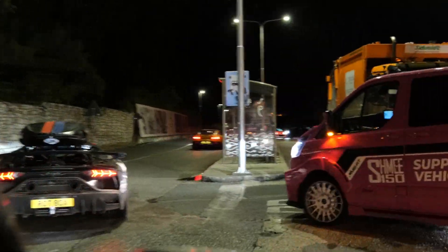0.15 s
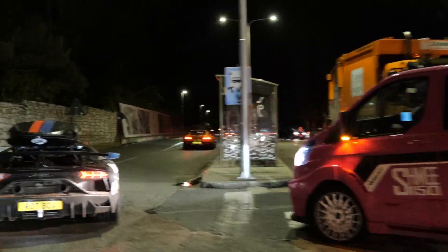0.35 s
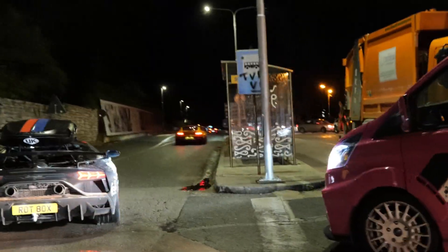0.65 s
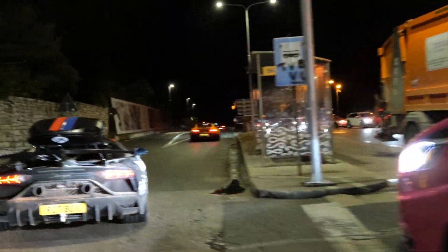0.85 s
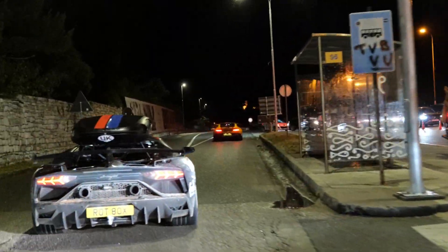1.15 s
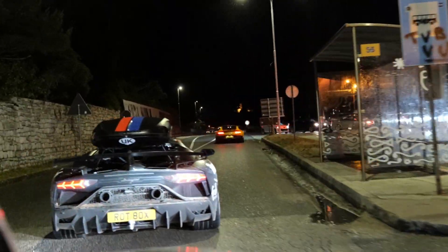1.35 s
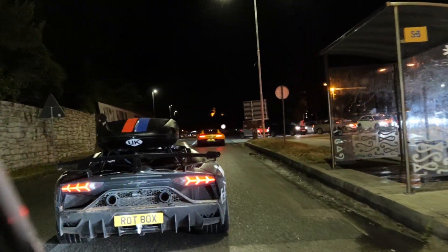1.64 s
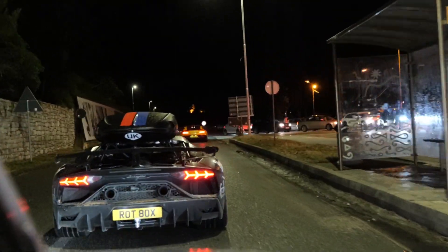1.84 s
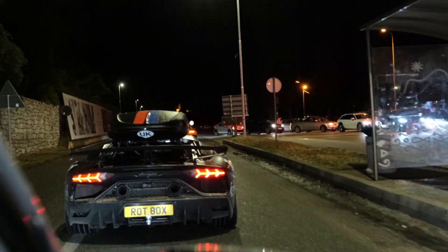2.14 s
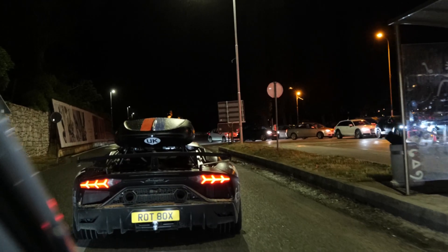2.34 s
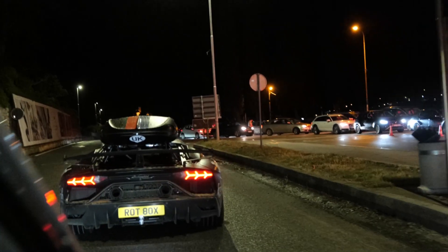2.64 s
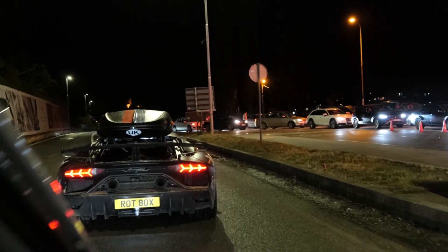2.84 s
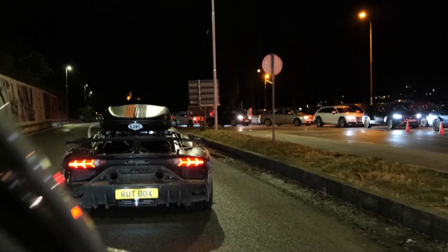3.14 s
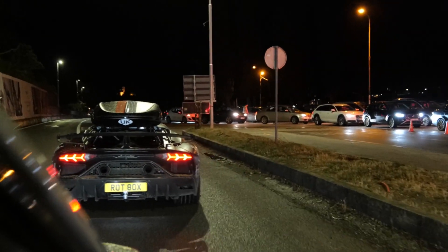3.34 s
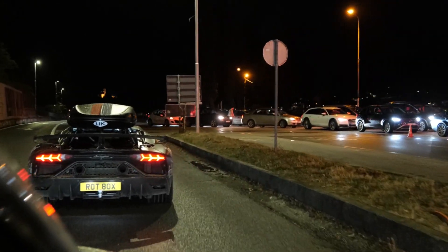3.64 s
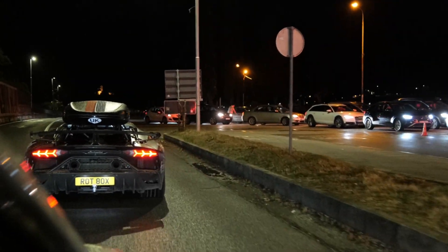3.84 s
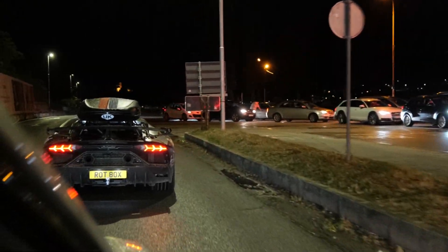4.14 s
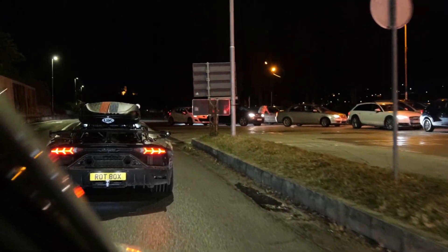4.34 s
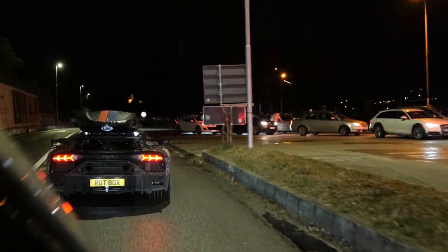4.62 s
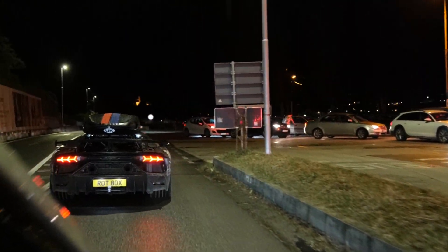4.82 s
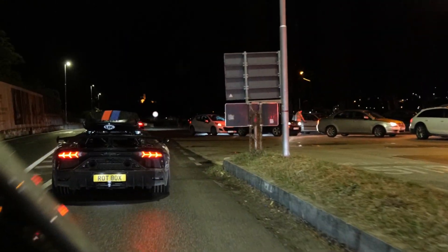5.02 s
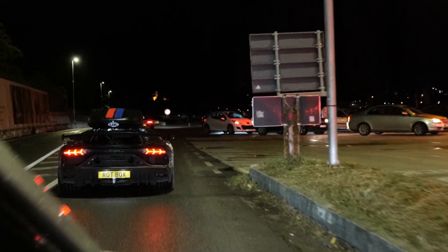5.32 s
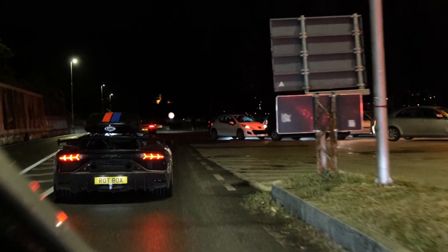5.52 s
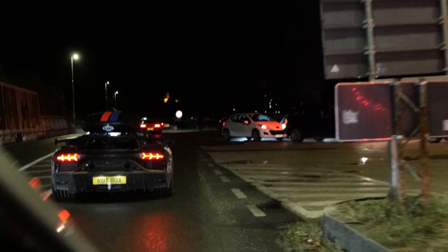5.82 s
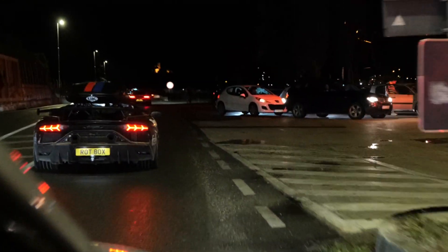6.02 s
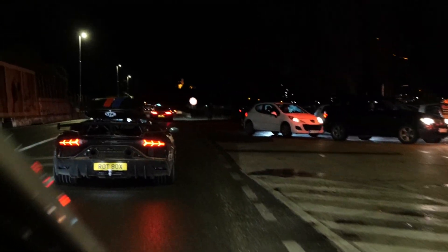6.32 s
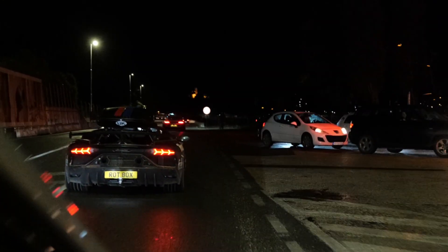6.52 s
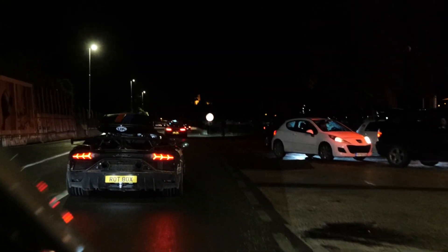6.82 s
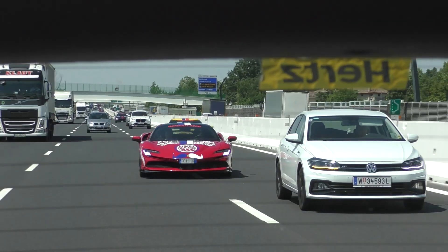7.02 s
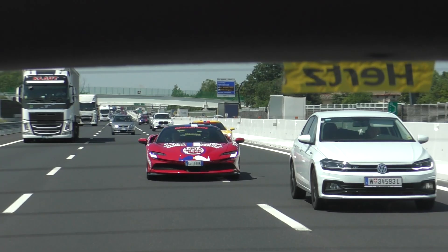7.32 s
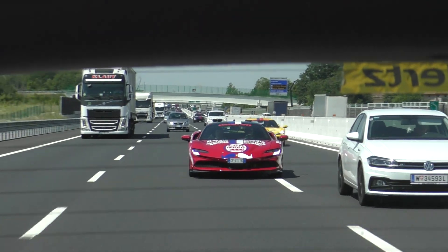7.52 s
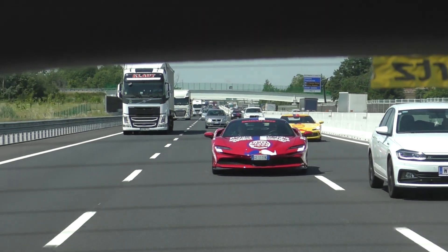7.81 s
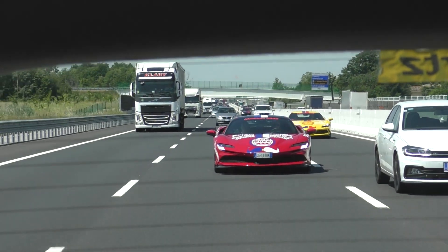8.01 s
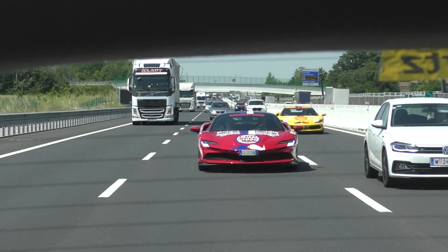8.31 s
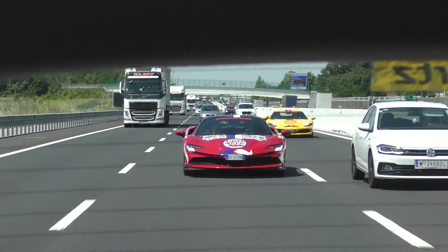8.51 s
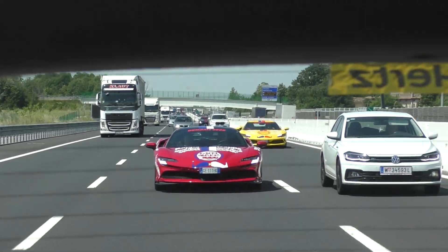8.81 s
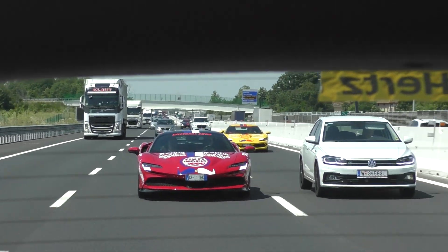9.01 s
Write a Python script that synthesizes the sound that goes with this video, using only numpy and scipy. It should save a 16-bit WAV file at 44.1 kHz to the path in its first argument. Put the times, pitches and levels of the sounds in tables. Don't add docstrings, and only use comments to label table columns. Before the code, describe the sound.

From 0 s a powerful sports-car engine roars just ahead of a following car, a thick, nearly steady low-mid note with gritty exhaust gas. Around 0.7-0.9 s it shifts up: the tone sags and breaks, a clutch squeak stutters briefly, a deep clunk lands with a puff of air. From about 1 s the lower, lumpy note climbs smoothly until nearly 5 s, wavering and raspy, with hollow pipe rings, small bright ticks and short rips near 3.6 and 4 s. Pops begin at 4.6 s; by 5.1-5.4 s the engine tone falls away, leaving dense burbles, thumps, sharp crackles and spits, with a faint coasting tone after 6.25 s and bright backfires near 6.7 s. At 6.9 s it cuts abruptly to a motorway cabin: much quieter, dull tyre rumble, faint wind hiss, and a soft fluctuating mid-low drone that fades, the hiss lifting slightly until about 9.1 s.

```python
import sys
import numpy as np
from scipy import signal
from scipy.fft import rfft, irfft, next_fast_len
from scipy.io import wavfile
from scipy.ndimage import uniform_filter1d

SR = 44100
rng = np.random.default_rng(int(sys.argv[2]) if len(sys.argv) > 2 else 0)


def attenuation_scalar(level_db):
    decades = np.asarray(level_db, float) / 20
    return 10 ** decades


def to_wav(sig):
    pcm = np.clip(np.atleast_2d(sig), -1, 1) * 32767
    pcm = np.round(pcm).astype(np.int16)
    wavfile.write(sys.argv[1], SR, pcm.T)


N = 403956
CUT_S = 6.895

# time_s, level_db
BURBLE = [(4.6, -37), (4.9, -34), (5.0, -30.5), (5.15, -24.5), (5.55, -24), (5.88, -20.5), (6.05, -23.5),
          (6.6, -27), (6.65, -26), (6.72, -27.5), (6.86, -22)]


def evened(x):
    return x / np.sqrt(np.mean(abs(x) ** 2) + 1e-20)


def read(points, hz):
    f, value = np.transpose(points)
    return np.interp(np.log(hz + 1), np.log(f + 1), value)


def played(rows):
    s, *columns = np.transpose(rows)
    return [np.interp(np.arange(N) / SR, s, c) for c in columns]


def between(start_s, end_s, fade_s):
    t = np.arange(N) / SR
    return np.clip(np.minimum(t - start_s, end_s - t) / fade_s + .5, 0, 1)


def bump(centre_s, length_s):
    t = np.arange(N) / SR
    return np.exp(-np.minimum(((t - centre_s) / length_s) ** 2, 50))


def bumps(events):
    return sum(db * bump(s, length) for s, db, length in events)


def flutter(hz, size=N):
    coarse = rng.standard_normal((size // 32 + 2, 2)) @ [1, 1j]
    r = np.exp(-2 * np.pi * hz * 32 / SR)
    once = signal.lfilter([1], [1, -r], coarse)
    slow = evened(signal.lfilter([1], [1, -r], once))
    return np.interp(np.arange(size) / 32, np.arange(len(slow)), slow)


def ring(hz, width_hz):
    carrier = np.exp(2j * np.pi * np.cumsum(hz * np.ones(N)) / SR)
    return np.sqrt(2) * (flutter(width_hz) * carrier).real


def noise(colour, same, lean, patchy_db, flicker_db):
    frames, hz = N // 256 + 16, np.fft.rfftfreq(1024, 1 / SR)
    a, b, c, d, patches = rng.standard_normal((frames, 513, 5)).T
    patches = uniform_filter1d(uniform_filter1d(patches, size=10, axis=0), size=12, axis=1)
    flicker = evened(uniform_filter1d(rng.standard_normal(frames), size=3))
    field = patchy_db * np.clip(evened(patches), -2, 2) + flicker_db * flicker
    same = np.clip(read(same, hz), -1, 1)[:, None]
    left = a + 1j * b
    right = same * left + np.sqrt(1 - same ** 2) * (c + 1j * d)
    z = np.array([left, right]) * attenuation_scalar(read(colour, hz)[:, None] + field)
    z = z * attenuation_scalar(np.outer([.5, -.5], read(lean, hz)))[:, :, None]
    return signal.istft(z, nperseg=1024, noverlap=768)[1][:, 512:N + 2560]


def layers(x, edges):
    size = next_fast_len(x.shape[1])
    z, hz = rfft(x, size), np.fft.rfftfreq(size, 1 / SR)
    above = [1] + [np.clip(.5 + 2 * np.log2((hz + 1) / e), 0, 1) for e in edges] + [0]
    return [evened(irfft(z * (lo - hi), size)[:, 1024:N + 1024]) for lo, hi in zip(above, above[1:])]


def add(mix, start_s, sound):
    part = mix[:, round(start_s * SR):][:, :sound.shape[-1]]
    part += sound[..., :part.shape[1]]


def cabin():
    # pitch_hz, density_db_per_hz
    cabin_colour = [(20, -43.5), (60, -6.5), (100, -9), (190, -10.5), (300, -13.5), (420, -19), (750, -29),
                    (1000, -33.5), (1400, -38), (2000, -45), (3000, -53.5), (5000, -59), (9000, -71.5),
                    (15000, -81.5)]
    # pitch_hz, likeness (0 to 1)
    cabin_same = [(60, 0.97), (130, 0.94), (270, 0.61), (580, 0.65), (1220, 0.33), (2600, 0.15)]
    # pitch_hz, left_right_db
    cabin_lean = [(60, 1), (130, 1.5), (270, -0.5), (580, -5.5), (1220, -2), (2600, 1)]
    # time_s, pitch_hz, level_db
    drone_curve = [(6.9, 234.5, -23), (7.15, 234.5, -28), (7.4, 234.5, -22), (7.7, 235, -27.5),
                   (8.1, 235.5, -25), (8.3, 235, -30.5), (9.16, 234.5, -30.5)]
    # pitch_hz, width_hz, level_db
    booms = [(305, 14, -35), (112, 10, -34.5), (185, 10, -35), (740, 16, -50), (985, 25, -52)]
    t = np.arange(N) / SR
    rumble, hiss = layers(noise(cabin_colour, cabin_same, cabin_lean, 0.81, 0.55), [1300])
    rumble = rumble * attenuation_scalar(-24.5 + 0.86 * (t - CUT_S))
    hiss = hiss * attenuation_scalar(-52.5 + 4 * np.maximum(t - 8.3, 0))
    hz, drone_db = played(drone_curve)
    tone = (1 + 0.13 * flutter(3.1)) * np.exp(2j * np.pi * np.cumsum(hz) / SR)
    drone = attenuation_scalar(drone_db) * np.sqrt(2) * tone.real
    return rumble + hiss + drone + sum(attenuation_scalar(db) * ring(f, w) for f, w, db in booms)


def ticks():
    # start_s, level_db, pitch_hz, left_right_db
    metal_ticks = [(0.7442, -21, 11500, 6.5), (0.8041, -35, 8560, 2.5), (0.8804, -32, 6120, 1.0),
                   (1.0395, -38, 9660, 3.0), (1.2785, -35, 7000, 1.5), (1.4594, -38, 6040, 2.5),
                   (1.5299, -37, 6060, 1.5), (1.8362, -37, 9860, 2), (1.8931, -36, 8270, 1),
                   (2.0981, -30, 8660, 1), (2.5216, -32, 7500, .5), (4.0756, -29, 6280, 1.0),
                   (4.9387, -42, 8430, -2.0)]
    # start_s, level_db, pitch_hz, left_right_db
    spits = [(5.018, -30, 3100, 4), (5.4237, -36, 3100, 0.5), (5.4794, -39.5, 3100, 0.0),
             (5.4932, -36, 3100, 2), (5.5685, -35.5, 3100, 3), (5.615, -35.5, 3100, 0.5),
             (5.6622, -38, 3100, 3), (5.7098, -30.5, 3100, -1.0), (5.75, -34, 3100, 3),
             (5.7726, -37.5, 3100, -0.5), (5.8045, -32, 3100, 3.5), (5.8267, -33, 3100, -2),
             (5.8594, -39, 3100, 1.5), (5.878, -40.5, 3080, 0), (5.899, -32.5, 3100, 1),
             (5.935, -28.5, 3040, 0.5), (5.9646, -34.5, 3100, 3), (6.016, -27.5, 3080, -0.5),
             (6.0598, -41, 3100, 0.5), (6.0993, -42.5, 3100, 1), (6.1658, -35, 3100, 3.5),
             (6.1815, -28.5, 3100, 3), (6.2455, -31, 3080, 0), (6.3109, -41, 3100, 2.5),
             (6.3482, -41, 3100, 1), (6.4477, -39, 3100, 0.5), (6.5722, -32.5, 3120, 5.5),
             (6.618, -30.5, 3100, 4.5), (6.6663, -30, 3120, 2.5), (6.6836, -31, 3080, -1.5),
             (6.726, -40, 3100, 0.0), (6.7966, -41.5, 3100, -2), (6.8262, -39, 3100, 2),
             (6.8355, -36, 3100, 3.5)]
    out, t = np.zeros((2, N)), np.arange(500) / SR
    for s, db, hz, pan_db in [*metal_ticks, *spits]:
        edges = np.clip([0.45 * hz, 1.3 * hz], 100, SR / 2.2)
        band = signal.butter(2, edges, "band", fs=SR, output="sos")
        strike = (rng.standard_normal(500) + 4.0 * (t == 0)) * np.exp(-t / 0.001)
        tick = signal.sosfilt(band, strike)
        add(out, s, attenuation_scalar(db) * tick / abs(tick).max() * attenuation_scalar([[pan_db / 2], [-pan_db / 2]]))
    return out


def squeak():
    # time_s, pitch_hz, level_db
    song = [(0.69, 1420, -29), (.71, 1470, -36), (0.727, 1510, -47), (0.745, 1560, -29.5),
            (0.78, 1590, -37), (0.805, 1605, -28.5), (0.858, 1600, -31), (.868, 1560, -38),
            (0.885, 1470, -35)]
    hz, db = played(song)
    tone = (1 + .3 * flutter(60)) * np.exp(2j * np.pi * np.cumsum(hz) / SR)
    tone = np.sqrt(2) * tone.real * between(song[0][0], song[-1][0], 0.017)
    return attenuation_scalar(db) * tone * attenuation_scalar([[1.5], [-1.5]])


def tears():
    # centre_s, level_db, length_s
    rips = [(6.661, -27, .002), (6.2, -29.5, .002), (6.679, -30, .003), (6.686, -24.5, 0.0034),
            (6.798, -27, 0.0016), (5.3, -32, .002), (4.05, -27, .012), (3.6, -31, .006)]
    out, t = np.zeros((2, N)), np.arange(-600, 600) / SR
    band = signal.butter(4, [800, 3300], "band", fs=SR, output="sos")
    colour = np.vstack([band, signal.butter(1, 1500, fs=SR, output="sos")])
    for s, db, length in rips:
        grit = rng.standard_normal((3, len(t)))
        rip = evened(signal.sosfilt(colour, grit[0] + .35 * grit[1:]))
        add(out, s + t[0], attenuation_scalar(db) * rip * np.exp(-(t / length) ** 2))
    return out


def flares():
    # centre_s, level_db, length_s, pitch_hz
    wavering_tones = [(1.2, -24, 0.14, 240), (1.6, -22, .1, 200), (4.015, -24, 0.038, 1200),
                      (3.7, -28, 0.037, 1030), (4.245, -28, 0.038, 1010), (4.4, -34, 0.17, 860),
                      (2.2, -33, .05, 1400), (3.05, -31, 0.11, 1100), (2.4, -37, 0.063, 440),
                      (2.6, -24.5, 0.32, 270), (0.85, -15, 0.042, 230), (1.3, -22, 0.09, 190)]
    out, t = np.zeros((1, N)), np.arange(-12000, 12000) / SR
    for s, db, length, hz in wavering_tones:
        tone = ((1 + .7 * flutter(60, len(t))) * np.exp(2j * np.pi * hz * t)).real
        add(out, s + t[0], attenuation_scalar(db) * np.exp(-(t / length) ** 2) * tone)
    return out


def gas():
    # time_s, flow_db
    flow_curve = [(0, -40.5), (.29, -42.5), (.67, -46.5), (.8, -42.5), (1.0, -40), (1.44, -38.5),
                  (1.7, -38), (2.1, -34), (2.6, -32.5), (3.1, -33), (3.5, -37), (3.95, -35.5), (4.25, -36),
                  (4.5, -47.5), (5.38, -45.5), (5.5, -54), (6.9, -50)]
    # centre_s, change_db, length_s
    surges = [(0, 11.5, 0.0073), (0.1, 2.5, 0.055), (0.2, -4.5, 0.057), (0.887, 6.5, 0.028),
              (1.628, 4, 0.086), (1.98, 3, 0.11), (3.19, 0.5, 0.073), (3.301, -3.5, 0.067),
              (3.38, 4, 0.037), (4.076, 4.5, .06), (4.137, -4, 0.027)]
    layer_db = [-26.5, -26, -40.5, -51.5]
    layer_share = [.2, .6, 1.009, 1.1]
    # centre_s, change_db, length_s
    gulp = (5.38, 3.7, 0.09)
    # centre_s, change_db, length_s
    vent = (0.89, 3.8, .05)
    # centre_s, change_db, length_s
    bangs = [
        (6.451, 9, 0.007),
        (6.735, 7.5, 0.014),
    ]
    t = np.arange(N) / SR
    change = played(flow_curve)[0] + 40 + bumps(surges)
    low, middle, rasp, hiss = (attenuation_scalar(db + share * change) for db, share in zip(layer_db, layer_share))
    burble = attenuation_scalar(played(BURBLE)[0]) * (t > BURBLE[0][0])
    deep = burble * attenuation_scalar(7.5 + 1.5 * np.maximum(t - 5.6, 0) + bumps([gulp]))
    bang_db = bumps(bangs)
    hiss = hiss * attenuation_scalar(-1.5 * np.maximum(t - 2.6, 0) + bumps([vent]))
    return np.hypot(low, deep), np.hypot(middle, burble) * attenuation_scalar(0.82 * bang_db), rasp * attenuation_scalar(bang_db), hiss


def roar(turn, levels, puff=0.11):
    # pitch_hz, density_db_per_hz
    roar_colour = [(40, -53.5), (80, -31.5), (130, -7), (220, 0), (330, -7), (550, -9), (850, -16),
                   (1300, -14), (2000, -18.5), (3200, -33), (4200, -35), (6300, -45.5), (10000, -50.5),
                   (15500, -68)]
    # pitch_hz, likeness (0 to 1)
    street_same = [(100, 1), (400, 0.97), (1000, 0.92), (4000, 0.87), (8000, 1), (12000, 0.83)]
    # pitch_hz, left_right_db
    street_lean = [(200, 1), (700, 0.5), (2600, 4), (8000, 2.5), (12000, 1.5)]
    roar_edges = [500, 2500, 6000]
    # pitch_hz, width_hz, level_db
    shell_modes = [(214.6, 9.8, -27), (289.4, 3, -45.5), (554.5, 9, -36), (1250, 37, -46), (1000, 76, -53)]
    # centre_s, level_db, length_s, pitch_hz, width_hz
    pipe_rings = [(2.5, -13.5, .7, 2270, 45), (.3, -8.5, 0.56, 1800, 40), (4.8, -11.5, 0.49, 1840, 25),
                  (2.58, -8, 1, 1245, 40), (3.45, -8, .15, 1450, 80)]
    # centre_s, level_db, length_s, pitch_hz, width_hz
    tip_rings = [(1.6, -1.5, .08, 4150, 320), (2.045, -6, 0.12, 4150, 200), (2.4, -5, 0.064, 4250, 300),
                 (1.44, -6.5, 0.074, 5600, 300), (1.63, 0, 0.15, 2950, 300), (1.7, -0.5, .08, 2850, 300),
                 (.6, -0.5, 0.46, 2950, 230)]
    low_gain, middle_gain, rasp_gain, hiss_gain = levels
    gas_noise = noise(roar_colour, street_same, street_lean, 1.15, 0.98)
    low, middle, rasp, hiss = layers(gas_noise, roar_edges)
    gate = evened(1 + puff * np.cos(turn) + 0.099 * flutter(90).real)
    flow = attenuation_scalar(-11.5 * between(5.1, 99, .5))
    shell = sum(attenuation_scalar(db) * ring(hz, w) for hz, w, db in shell_modes) * middle_gain * attenuation_scalar(23.5)
    middle = middle + sum(attenuation_scalar(db) * bump(s, length) * ring(hz, w) for s, db, length, hz, w in pipe_rings)
    rasp = rasp + sum(attenuation_scalar(db) * bump(s, length) * ring(hz, w) for s, db, length, hz, w in tip_rings)
    body = low_gain * low + gate * middle_gain * attenuation_scalar(-2.5) * middle + shell + flares()
    return flow * body + gate * (np.sqrt(flow) * rasp_gain * rasp + hiss_gain * hiss)


def pop(low_db, high_db):
    # pitch_hz, level_db
    pop_colour = [(70, -20.5), (110, -1.5), (170, 0.5), (260, -10), (400, -3), (600, -5.5), (900, -10),
                  (1400, -17), (2200, -29), (3300, -39.5), (5000, -58.5), (8000, -71), (12000, -60)]
    hz, t = np.fft.rfftfreq(2048, 1 / SR), np.arange(1500) / SR
    ripple = read(np.c_[np.geomspace(100, 9000, num=12), 3.5 * rng.standard_normal(12)], hz)
    tilt = [(300, low_db), (550, 0.0018), (1500, 0.0078), (3000, 0.36 * high_db + 0.5),
            (5000, high_db), (9000, high_db), (15000, high_db - 14.5)]
    db = read(pop_colour, hz) + read(tilt, hz) + ripple
    fold = irfft(db * np.log(10) / 20) * np.r_[1, 2 * np.ones(1023), 1, np.zeros(1023)]
    z = np.exp(rfft(fold))
    burst = rng.standard_normal((3, len(t)))
    blow = (0.75 * burst[0] + 0.69 * burst[1:]) * 0.12 * np.exp(-t / .0045)
    blow[:, 0] = rng.choice([-1, 1])
    crack = irfft(z * (hz > 500) * (hz < 4000))[:1200]
    peak = abs(signal.fftconvolve(blow[0], crack)).max()
    return signal.fftconvolve(blow, irfft(z)[None, :1200], axes=1) / peak


def crackle(middle_gain, per_s=300):
    # start_s, crack_db, thud_db relative to the crack
    pops = [(4.608, -16, -5.5), (4.654, -17.5, -1), (4.713, -18.5, -1.5), (4.848, -18.5, -4.5),
            (4.873, -14.5, -11), (4.921, -15, 1), (4.938, -14, -7), (5.061, -11.5, -4), (5.091, -13.5, -2),
            (5.124, -11.5, -9.5), (5.186, -12.5, -4), (5.207, -16, -3.5), (5.281, -21, -6),
            (5.301, -19.5, -4), (5.322, -12, -8), (5.373, -17.5, 6), (5.405, -14.5, -2.5),
            (5.42, -12.5, -3.5), (5.443, -12.5, -1), (5.486, -14, -6), (5.525, -12.5, -5), (5.548, -14, -4),
            (5.571, -9.5, -1), (5.616, -9.5, -6), (5.654, -19.5, -5), (5.669, -8, -9.5), (5.691, -16, 0),
            (5.703, -16, -12), (5.751, -14, -3), (5.772, -13, -3), (5.794, -11.5, -8), (5.841, -12, -4.5),
            (5.867, -16.5, -4.5), (5.916, -15, 0.5), (5.973, -14.5, -0.5), (5.992, -13, -1),
            (6.028, -20.5, -2), (6.049, -14.5, -4.5), (6.083, -17.5, -3), (6.102, -19.5, -2.5),
            (6.142, -20, 2), (6.165, -12, -0.5), (6.213, -18.5, 0), (6.249, -13, -1), (6.349, -14, -7),
            (6.399, -21, -7), (6.429, -16, -1), (6.467, -20, -8), (6.509, -17.5, 5), (6.551, -19, 2),
            (6.618, -20, -7), (6.665, -14, -8), (6.682, -11, -3), (6.726, -18, 5), (6.77, -19.5, -6),
            (6.789, -16.5, -2), (6.834, -9.5, -7.5), (6.863, -16, -4)]
    # start_s, level_db, pitch_hz
    thumps = [(0.869, -4, 221), (0.904, -12.5, 257), (.935, -12, 250), (3.242, -7.5, 419),
              (4.876, -20.5, 520), (4.93, -15, 478), (5.105, -15.5, 610), (5.365, -10, 150.5),
              (5.395, -13, 138), (5.419, -9.5, 148), (5.442, -17.5, 429), (5.66, -13.5, 219),
              (5.838, -13, 475), (5.983, -17, 265), (6.338, -8, 193), (6.483, -23, 230), (6.535, -9.5, 268),
              (6.639, -15, 201), (6.81, -15, 218)]
    out, t = np.zeros((2, N)), np.arange(1500) / SR
    for s, level_db, thud_db in pops:
        add(out, s, attenuation_scalar(level_db - 3.0) * pop(thud_db, 1.5))
    for s, db, hz in thumps:
        add(out, s, attenuation_scalar(db) * np.sin(2 * np.pi * hz * t) * np.exp(-t / .007) * 1.1)
    shut = round(BURBLE[0][0] * SR)
    burble = (middle_gain * between(5.12, CUT_S, 0.15))[shut:]
    for _ in range(10):
        size = attenuation_scalar(-6.5 + 3.6 * np.minimum(rng.exponential(1, N - shut), 2.2))
        train = (rng.random(N - shut) < per_s / 10 / SR) * size * burble
        add(out, shut / SR, signal.oaconvolve(train[None], pop(-5.5, 3.0), axes=1))
    return out


def gear(rows, rough=0.13, wobble_hz=16):
    # pitch_hz, width_hz, level_db
    pipe_modes = [(125, 34, 0), (188, 16, 2), (212, 45, 0), (238, 18, -1), (345, 18, 0), (296, 40, 0),
                  (405, 40, -2), (550, 40, -1), (670, 40, -3), (890, 50, -13), (1100, 60, -12),
                  (1225, 50, -11)]
    # pitch_hz, lift_db
    octave = [(240, -6), (265, 3), (283, 19), (308, 20), (320, -4), (345, 11), (365, 13), (395, -10),
              (420, 5), (460, -1.5)]
    # firing_hz, level_db
    lumpy = [(118, -25.5), (135, -33.5), (145, -31), (172, -24), (183, -43), (200, -33), (210, -56.5),
             (225, -36)]
    # multiple of firing, level_db
    higher = [(3, 2), (4, 2), (5, -3), (6, -8.5)]
    # multiple of firing, level_db
    uneven_orders = [(.75, 5), (1.25, 1), (1.5, 1), (1.75, 1), (2.25, -8), (2.75, -3), (3.25, -7),
                     (3.75, -9), (4.25, -9)]
    span = slice(round(rows[0][0] * SR), round(rows[-1][0] * SR))
    hz, firing_db, bite_db = (c[span] for c in played(rows))
    turn = 2 * np.pi * np.cumsum(hz) / SR
    grid = np.arange(4000.)
    pipe = np.sqrt(sum(attenuation_scalar(2 * db) / (1 + (2 * (grid - f) / w) ** 2) ** 1.5 for f, w, db in pipe_modes))
    tones = [(1, attenuation_scalar(firing_db), rough), (2, attenuation_scalar(bite_db + read(octave, 2 * hz)), 1.8 * rough)]
    for k, db in higher:
        tones.append((k, attenuation_scalar(bite_db + db) * np.interp(k * hz, grid, pipe), 2.8 * rough))
    for k, db in uneven_orders:
        tones.append((k, attenuation_scalar(read(lumpy, hz) + db) * np.interp(k * hz, grid, pipe), 1.2 * rough))
    out = np.zeros((2, N))
    for k, size, uneven in tones:
        phase = 1.6 + 1.3 * (k > 1)
        waver = (1 + uneven * flutter(wobble_hz, len(hz))) * np.exp(1j * phase)
        out[0, span] += np.sqrt(2) * size * (waver * np.exp(1j * k * turn)).real
    out[1, span] = turn
    return out[0] * between(rows[0][0] + 0.0018, rows[-1][0] - .006, 0.0099), out[1]


def engine_orders():
    # time_s, firing_hz, firing_db, bite_db of the upper multiples
    first = [(0, 195.4, -8, -16.5), (.1, 202.9, -6.5, -19.5), (.25, 201.9, -7, -21.5),
             (.45, 204.9, -7.5, -22.5), (.6, 204.8, -7.5, -19.5), (.7, 197.4, -8, -29),
             (.745, 191.6, -22, -55), (.805, 170.7, -6, -57), (.83, 158.6, -42, -40)]
    second = [(.82, 120.6, -30, -40), (.88, 119.7, -15, -40), (0.958, 118.4, -21, -48),
              (1.099, 131, -15, -29.5), (1.28, 123.8, -12.5, -26.5), (1.399, 134, -14.5, -31),
              (1.5, 124.4, -12, -26), (1.598, 133.3, -19.5, -23.5), (1.74, 134.4, -13, -29),
              (2.2, 147.3, -14.5, -36), (2.5, 155.6, -14.5, -41.5), (2.751, 164.2, -17.5, -28),
              (3.301, 181.5, -23, -52), (3.449, 186, -10, -38), (3.9, 200.7, -10.5, -27),
              (4.301, 212.1, -6.5, -26.5), (4.899, 227.6, -12, -37)]
    lift = [(4.96, 228.8, -19.5, -37), (5.03, 230.7, -26, -36), (5.09, 231.8, -15, -43),
            (5.13, 233.4, -24, -46), (5.17, 225.5, -18, -38), (5.251, 226, -18, -36.5),
            (5.32, 222.2, -33, -41), (5.399, 201, -25, -46)]
    coast = [(6.251, 180.6, -34, -51), (6.451, 179.2, -35, -75), (6.699, 183, -25.5, -55),
             (6.901, 182.3, -40, -58)]
    # centre_s, change_db, length_s
    stumbles = [(0.83, -12.5, 0.05), (0.962, -14, 0.015), (2.004, -7, 0.047), (2.714, -6.5, 0.035),
                (3.298, 2.5, 0.054), (3.532, -7, 0.029), (3.677, -6.5, 0.037), (3.87, -2.5, 0.061),
                (4.25, -3, 0.04)]
    engine, turn = sum(np.array(gear(rows)) for rows in (first, [*second, *lift], coast))
    return engine * attenuation_scalar(bumps(stumbles)), turn


def scene():
    engine, turn = engine_orders()
    levels = gas()
    street = engine + roar(turn, levels) + squeak() + crackle(levels[1]) + ticks() + tears()
    street = signal.sosfilt(signal.butter(4, 80, "high", fs=SR, output="sos"), street)
    inside = signal.sosfilt(signal.butter(2, 35, "high", fs=SR, output="sos"), cabin())
    return street * between(-1, CUT_S, .008) + inside * between(CUT_S, N / SR - .004, .008)


def top_cut(x):
    return signal.sosfilt(signal.butter(12, 15790, fs=SR, output="sos"), x)


def record(dry):
    mix = 1.8 * np.tanh(dry / 1.8)
    return top_cut(mix)


dry = scene()
out = record(dry)
to_wav(out)
```